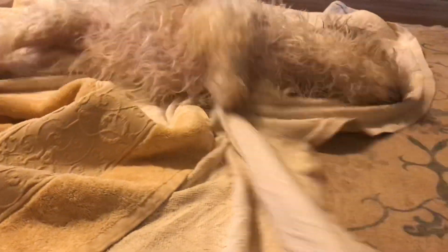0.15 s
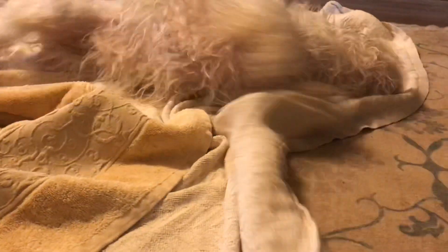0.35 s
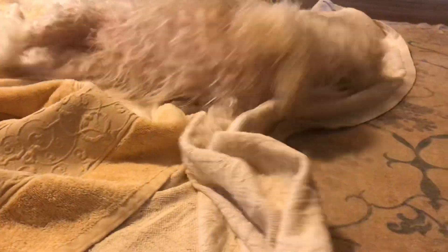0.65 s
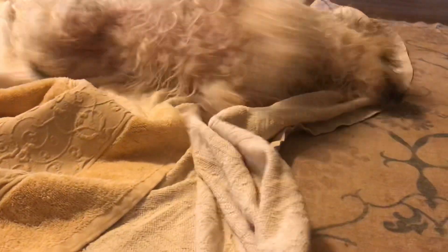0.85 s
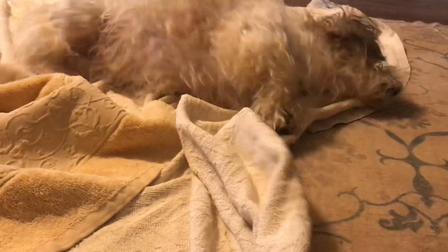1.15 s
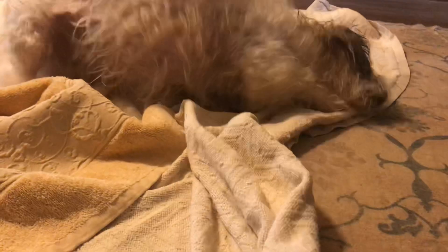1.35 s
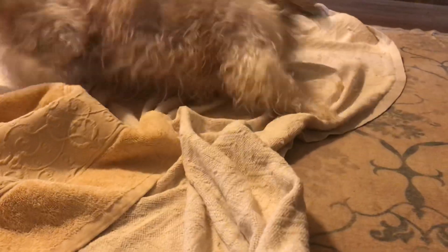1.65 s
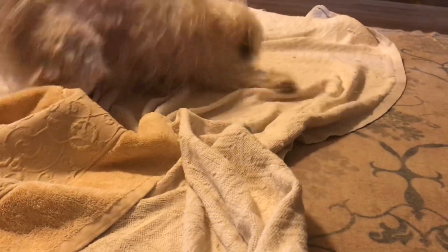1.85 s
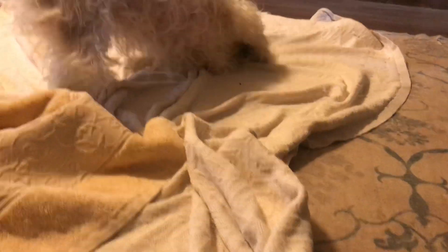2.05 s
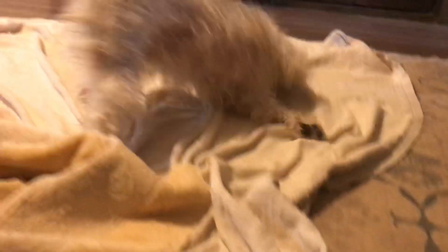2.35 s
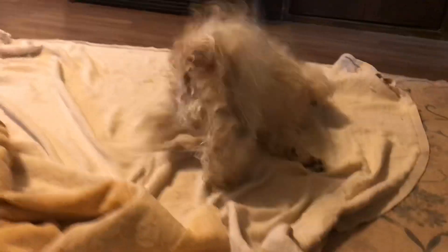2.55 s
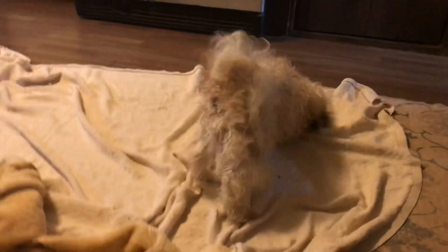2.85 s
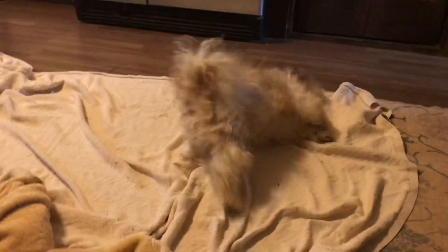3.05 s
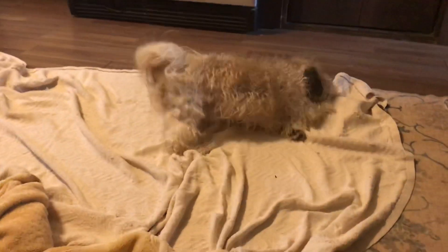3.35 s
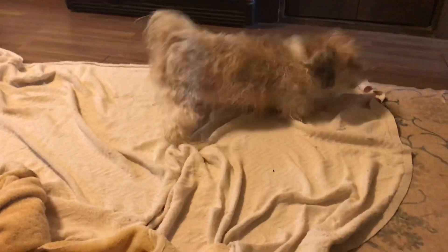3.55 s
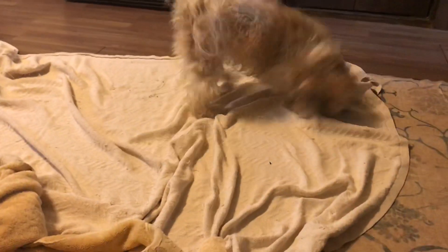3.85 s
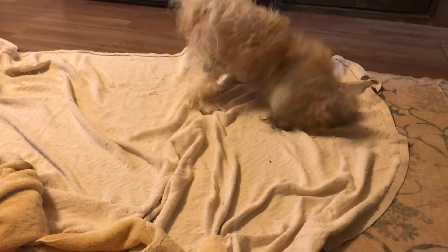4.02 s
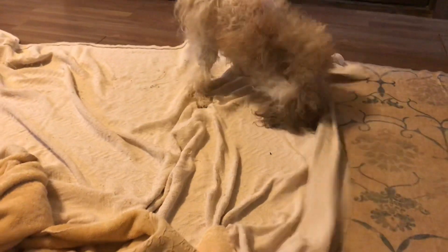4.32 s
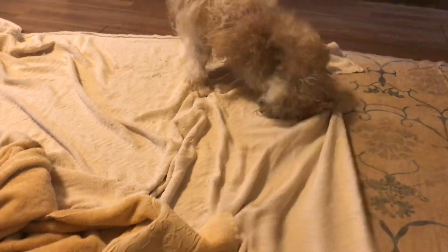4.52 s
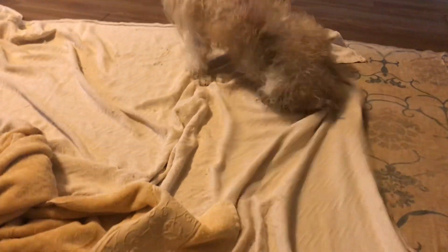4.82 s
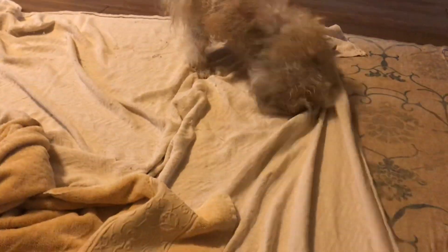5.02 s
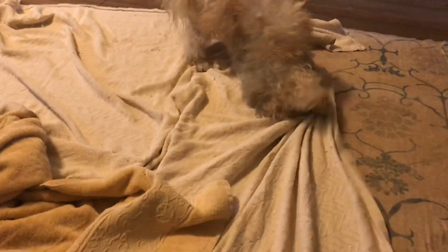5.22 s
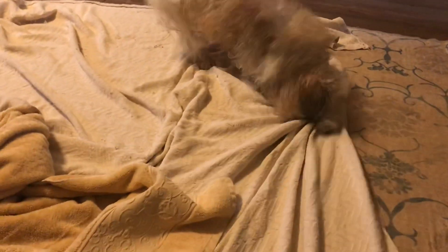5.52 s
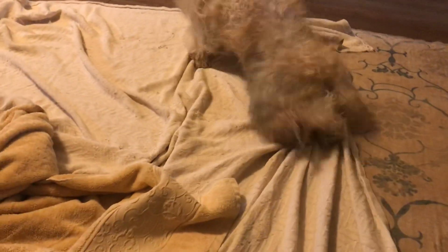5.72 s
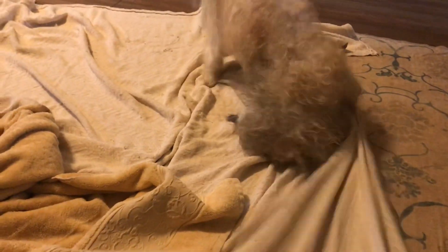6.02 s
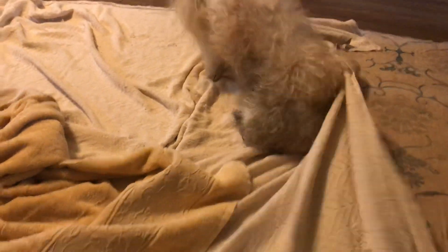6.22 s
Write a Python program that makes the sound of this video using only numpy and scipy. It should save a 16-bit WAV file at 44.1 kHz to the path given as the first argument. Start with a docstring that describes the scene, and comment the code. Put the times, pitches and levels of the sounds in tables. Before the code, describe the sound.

Close up indoors, a little dog blasts air through its wet nose in rapid rattling bursts, then calms into uneven snuffling. Cloth strokes and light fur swishes accompany its wriggling, with soft knocks of paws and body on a padded floor. Later come quick nasal in-breaths, dull drags on the towel, dry fabric ticks and a last rustle. A low steady mains hum and still air lie beneath.

```python
"""Dog snorting on towels

A small dog rolls and roots on towels on a living-room floor, with four snorts: noise jets through
nasal resonances, chopped by the palate, over a throat rush. Snuffles, two dull drags or presses,
gasps and faint whistles are shaped noise; fur and cloth rub as crackling noise; bumps and fold
snaps are damped pulses with noise. A mains hum and still air lie under it all; a small room answers."""
import sys
import numpy as np
from scipy import signal
from scipy.fft import rfft, irfft, next_fast_len
from scipy.io import wavfile
from scipy.ndimage import uniform_filter1d, map_coordinates

SR = 44100
rng = np.random.default_rng(int(sys.argv[2]) if len(sys.argv) > 2 else 0)


def file_out(sig):
    """Save sig as 16-bit WAV at sys.argv[1]."""
    # one column per channel
    cols = np.atleast_2d(sig).T
    # limit, then scale
    lim = np.clip(cols, -1, 1)
    pcm = np.round(lim * 32767).astype(np.int16)
    wavfile.write(sys.argv[1], SR, pcm)


N = 281358
TIME = np.arange(N) / SR


def amp(db):
    """Decibels to gain."""
    return 10 ** (np.asarray(db) / 20)


def unit(x):
    """Scale to rms 1."""
    return x / np.sqrt(np.mean(x ** 2) + 1e-20)


def fade(t, t60):
    """Exponential decay from t = 0, 60 dB down after t60 seconds."""
    return amp(-60 * np.maximum(t, 0) / t60)


def along(points, hz):
    """Read (frequency [Hz], value) points on a log frequency axis."""
    f, v = np.transpose(points)
    return np.interp(np.log(hz + 1), np.log(f + 1), v)


def filtered(x, response):
    """Multiply the spectrum of x by a function of frequency."""
    m = next_fast_len(len(x) + SR // 8)
    spectrum = rfft(x, m) * response(np.fft.rfftfreq(m, 1 / SR))
    return irfft(spectrum, m)[:len(x)]


def coloured(x, spectrum):
    """x shaped by (frequency [Hz], level [dB]) points, rms 1."""
    return unit(filtered(x, lambda f: amp(along(spectrum, f))))


def resonated(x, modes):
    """x through parallel (frequency [Hz], width [Hz], level [dB]) resonances of alternating sign, rms 1."""
    def response(f):
        total = 0
        for k, (centre, width, db) in enumerate(modes):
            band = 1j * f * width / (centre * centre - f * f + 1j * f * width)
            total = total + (-1) ** k * amp(db) * band
        return total
    return unit(filtered(x, response))


def wobble(rate, size=N):
    """Smooth random curve, rate knots a second."""
    knots = rng.standard_normal(int(size * rate / SR) + 4)
    return map_coordinates(knots, [np.arange(size) * rate / SR])


def turbulence(rate, depth_db, size=N):
    """Noise in small spurts, its colour shifting from moment to moment."""
    z = signal.stft(rng.standard_normal(size), nperseg=256)[2]
    patches = uniform_filter1d(rng.standard_normal(z.shape), size=4, axis=0)  # across frequency
    patches = uniform_filter1d(patches, size=6, axis=1)  # across time
    noise = signal.istft(z * amp(3.24 * unit(patches)))[1][:size]
    return noise * amp(depth_db * wobble(rate, size))


def crackle(rate):
    """Sparse clicks of uneven size, on average rate a second, rms 1."""
    return unit(rng.standard_normal(N) * (rng.random(N) < rate / SR))


def puff(t, rise, hold, t60):
    """A flow that swells from a soft start, holds and dies away."""
    swell = np.sin(np.pi / 2 * np.clip(t / rise, 0, 1)) ** 1.02
    return swell * fade(t - rise - hold, t60)


def thud(t, hz, cycles):
    """Damped sine under an envelope that crests at 1 after some cycles."""
    u = t * hz / cycles
    return u ** 2 * np.exp(2 * (1 - u)) * np.sin(2 * np.pi * hz * t)


def add(track, s, sound):
    """Mix a sound into the track at time s."""
    part = track[max(round(s * SR), 0):][:len(sound)]
    part += sound[:len(part)]


def gush(t):
    """Pressure builds for a few milliseconds behind the palate and drops as it slaps shut."""
    return np.exp(-((t + .0035) / .004) ** 2) - np.exp(-((t - .0035) / .0035) ** 2)


def wandering(x, depth, rate):
    """The resonances in x drift up and down together, as soft walls move."""
    return map_coordinates(x, [np.cumsum(1 + depth * wobble(rate))], mode="mirror")


# snorts: (time [s], rise [s], hold [s], fade t60 [s], nose [dB], throat [dB], nostril flare [0-1],
#          palate flutter [Hz])
SNORTS = [(0.0782, 0.048, 0.035, 0.086, -29.5, -35, 0.22, 55.95),
          (0.828, 0.052, 0.037, 0.15, -30, -34.5, 0.8, 73.7),
          (1.49, 0.045, 0.033, 0.095, -32, -37, 0.08, 77.54),
          (3.006, 0.00078, 0.0055, 0.2, -41, -37, 0, 77.9)]
# narrow nasal passages: (frequency [Hz], width [Hz], level [dB])
NARROW_NOSE = [(1430, 200, -3.5), (2485, 520, 0.5), (2980, 600, 0.5), (4590, 270, -3.5), (5260, 520, -6),
               (7130, 220, -2), (8140, 370, -7.5), (9560, 510, -8), (11300, 820, -13), (14900, 4400, -18.5)]
# wide nostrils: (frequency [Hz], level [dB])
FLARED_NOSE = [(300, -58), (1300, -2), (1900, -5.5), (3600, 4), (5300, -5.5), (6700, -0.5), (9200, -2.5),
               (10500, -6.5), (15500, -11)]
# throat resonances: (frequency [Hz], width [Hz], level [dB])
THROAT = [(146, 72, -5), (692, 104, -7.5), (1010, 115, -4.5)]
NASAL_DRIFT, DRIFTS_PER_S = 0.022, 60  # scale of the wander as a share of pitch
# above SNORT_TOP_HZ the jet lags its body and grows faster than the flow
SNORT_TOP_HZ, SNORT_TOP_POWER, TOP_LAG_S = 5000, 1.4, 0.0018


def snorts(beats):
    """Air blasts through the wet nose, chopped by palate flaps, and the throat; stronger flow is brighter."""
    gush_db = sum(db * gush(TIME - s) for s, _, _, db in beats)
    jet = unit(turbulence(rate=420, depth_db=0.4)) + 0.37 * crackle(rate=1100)
    narrow = wandering(resonated(jet, NARROW_NOSE), NASAL_DRIFT, DRIFTS_PER_S)
    wide = wandering(coloured(jet, FLARED_NOSE), NASAL_DRIFT, DRIFTS_PER_S)
    rush = resonated(turbulence(rate=310, depth_db=1.5), THROAT)
    rush = unit(filtered(rush, lambda f: 1 / (1 + (f / 1500) ** 4)))
    nose, throat = np.zeros(N), np.zeros(N)
    for s, rise, hold, t60, nose_db, throat_db, flare, _ in SNORTS:
        flare = np.clip(flare, 0, 1)
        air = unit((1 - flare) * narrow + flare * wide)
        body = filtered(air, lambda f: 1 / (1 + (f / SNORT_TOP_HZ) ** 4))
        flow = puff(TIME - s, rise, hold, t60)
        top_flow = puff(TIME - s - TOP_LAG_S, rise, hold, t60) ** SNORT_TOP_POWER
        nose += amp(nose_db + gush_db) * (flow * body + top_flow * (air - body))
        throat += amp(throat_db) * flow * rush
    return nose, throat


FLAP_DB, FLAP_HZ, FLAP_JITTER_S = 10, 673, 0.00088  # level over throat rush, typical ring, timing scatter
FLARE_POP_DB, FLARE_RELIEF = 7.5, 0.7  # at full flare: louder pops, share of chopping lost
CHOP_DB = 6.5  # gush over the steady jet, choked after it, at full flow without flare


def flutter():
    """The palate flaps near-steadily, as hard as the air flows: rows (s, level dB, ring Hz, gush dB)."""
    rows = []
    for s, rise, hold, t60, _, throat_db, flare, hz in SNORTS:
        chance = rng.standard_normal((12, 4))  # 12 flaps a snort
        for k, (late, size, pitch, spurt) in enumerate(chance, 1):
            flow = puff(k / hz, rise, hold, t60)
            db = throat_db + FLAP_DB + FLARE_POP_DB * flare + 20 * np.log10(flow ** 2 + 1e-6)
            gush_db = CHOP_DB * (1 - FLARE_RELIEF * flare) * flow * (1 + 0.041 * spurt)
            ring_hz = FLAP_HZ * np.exp(.18 * pitch)
            rows.append((s + k / hz + FLAP_JITTER_S * late, db + 2.0 * size, ring_hz, gush_db))
    return rows


# palate slamming shut: (time [s], level [dB], ring [Hz])
SLAMS = [(.078, -21.5, 990), (.1155, -21, 586), (.869, -18, 760), (.880, -13.5, 1060), (0.9089, -8.5, 800),
         (3.0072, -21.5, 794), (3.019, -27, 850)]
PUSH_DB, SLAM_PUSH_DB, WET_CLICK_DB = -26, -12.5, -25.5  # relative to the pop


def flaps(beats):
    """Each palate slap pops in the throat with a wet-tissue click and pushes out a slug of air."""
    out, t = np.zeros(N), TIME[:SR // 16]
    push = thud(t, hz=163, cycles=0.27)
    for slaps, push_db in [(beats, PUSH_DB), (SLAMS, SLAM_PUSH_DB)]:
        for s, db, hz, *_ in slaps:
            click = amp(WET_CLICK_DB) * rng.standard_normal(len(t)) * fade(t, t60=0.025)
            pop = thud(t, hz, cycles=0.82)
            add(out, s, amp(db) * (pop + amp(push_db) * push + click))
    return out


# lowest room modes: (frequency [Hz], width [Hz], level [dB])
BOOM_MODES = [(78, 7, 3.5), (172, 14, -5)]


def boom():
    """Each snort's blast stirs the lowest room modes 25 ms late: narrow noise bands follow its flow."""
    drive = 0
    for s, rise, hold, t60, _, throat_db, *_ in SNORTS:
        drive = drive + amp(throat_db) * puff(TIME - s - .025, rise, hold / 2, t60)
    return drive * resonated(rng.standard_normal(N), BOOM_MODES)


# sniffs, and two dull muffled drags or presses on the towel at 4.19 and 4.77:
# (time [s], rise [s], fade t60 [s], level [dB], brightness [dB], nasal band [dB])
SNUFFLES = [(0.762, 0.022, 0.54, -56.5, -4, 5.5), (1.651, 0.013, 0.62, -52.5, -4.5, 1.5),
            (1.753, 0.0068, 0.76, -51.5, 10.5, 5), (2.468, 0.016, 0.35, -54, -6, 1),
            (2.556, 0.0095, 0.3, -49.5, -5, -3), (2.631, 0.0044, 0.37, -43, -4, -4),
            (2.724, 0.009, 0.7, -50, 6.5, -2), (2.779, 0.0045, 0.4, -43.5, -3.5, 3.5),
            (3.688, 0.019, 0.46, -39.5, 3.5, 0), (4.189, 0.019, 0.23, -46.5, -24.5, -26),
            (4.462, 0.024, 0.31, -41, -7, 1), (4.54, 0.0093, 0.32, -45.5, 0.5, -1),
            (4.65, 0.0037, 0.32, -55, 8, 9), (4.679, 0.0093, 0.28, -53, 0.5, 11.5),
            (4.772, 0.034, 0.19, -39.5, -17, -14), (5.447, 0.038, 0.55, -56.5, -1.5, 8.5),
            (5.647, 0.0034, 0.37, -49.5, 1, 6)]
# nasal band: (frequency [Hz], level [dB])
SNIFF = [(480, -5.5), (1080, 1), (1900, 0.5), (2330, 3.5), (3000, -2), (4200, -9), (12000, -91)]
# nostril hiss, also the colour of snap ticks: (frequency [Hz], level [dB])
HISS = [(1500, -19), (3400, 3), (6000, -1), (9600, -9.5), (10500, -14.5), (15500, -13)]
# lingering narrow band: (frequency [Hz], level [dB])
NASAL_RING = [(1800, -40), (2300, -1), (2620, -2.5), (2950, -42)]
MUZZLE_HZ, MUZZLE_OCTAVE_DB = 1600, 19.5  # resonance sinks an octave per this much negative brightness
RING_DB, RING_LINGER = -4, 1.05  # lingering band over nasal band: level, fade-time ratio
FOLLOW_LAG = 0.36  # nasal band delay, share of the rise
HISS_POWER = 1.51  # hiss grows faster than flow


def snuffles():
    """Sniffs and two dull drags or presses: a low resonance leads, nasal band, hiss and a narrow band follow."""
    out, t = np.zeros(N), TIME[:SR // 2]

    def air(shape):
        return coloured(turbulence(rate=380, depth_db=1.5, size=len(t)), shape)

    for s, rise, t60, db, bright_db, nose_db in SNUFFLES:
        hz = MUZZLE_HZ * 2 ** (min(bright_db, 0) / MUZZLE_OCTAVE_DB)
        hollow = [(hz / 6, -14), (hz / 2, -14), (hz * 0.95, 1), (hz * 1.78, -5), (hz * 3, -25), (hz * 10, -48)]
        muzzle = air(hollow) * puff(t, rise / 2, rise / 2, t60)
        nose = amp(nose_db) * air(SNIFF) * puff(t - FOLLOW_LAG * rise, rise, 0, t60)
        hiss = amp(bright_db) * air(HISS) * puff(t, rise, rise, t60) ** HISS_POWER
        ring = amp(nose_db + RING_DB) * air(NASAL_RING) * puff(t, rise + 0.014, 0, t60 * RING_LINGER)
        add(out, s, amp(db) * (muzzle + nose + hiss + ring))
    return out


# in-draughts through pinched nostrils: (time [s], rise [s], level [dB], resonance [Hz],
#                                        upper resonances [dB])
GASPS = [(3.600, 0.0026, -53.5, 1580, -1), (3.644, 0.0091, -38, 1630, -8.5),
         (4.437, 0.029, -36.5, 1154, -17)]
GASP_T60_S = 0.15


def gasps():
    """Air drawn in sharply rings one muzzle resonance, lower and duller when pressed into the towel."""
    out, t = np.zeros(N), TIME[:SR // 4]
    for s, rise, db, hz, upper_db in GASPS:
        shape = [(hz / 2, -35), (hz * 0.76, -9), (hz, 0), (hz * 1.12, -8),
                 (hz * 2.78, upper_db), (hz * 3, upper_db - 23.5)]
        air = coloured(rng.standard_normal(len(t)), shape)
        add(out, s, amp(db) * air * puff(t, rise, rise / 2, GASP_T60_S))
    return out


# thin nostril whistles: (time [s], length [s], level [dB])
WHISTLES = [(0.295, 0.056, -54), (5.266, 0.069, -58.5)]


def whistles():
    """Air squeezes through a nearly closed nostril: noise in two high resonances."""
    flow = 0
    for s, length, db in WHISTLES:
        flow = flow + amp(db) * puff(TIME - s, length / 2, length / 4, t60=0.08)
    return flow * resonated(rng.standard_normal(N), [(6440, 590, -1.5), (9500, 730, -1)])


# strokes on the towel; the row at 0.174 is the bright hissing end of the first snort:
# (time [s], length [s], cloth [dB], fur over cloth [dB])
RUBS = [(0.174, 0.083, -67, 16), (0.406, 0.082, -57.5, -12), (0.492, 0.11, -50, -25),
        (1.675, 0.095, -50, -7.5), (1.762, 0.21, -63, -4), (2.069, 0.039, -52.5, -40),
        (2.311, 0.14, -60, 3.5), (2.907, 0.21, -48.5, -0.5), (3.265, 0.051, -63, -38), (3.3, 0.08, -72, 0),
        (3.66, 0.17, -51, 9.5), (4.185, 0.086, -52, -12), (4.788, 0.094, -47, -39),
        (4.967, 0.076, -61, -10), (5.129, 0.14, -58.5, -2), (5.294, 0.041, -67, 10),
        (5.848, 0.37, -58.5, -4), (6.225, 0.14, -46.5, -5.5), (6.348, 0.04, -52, 4.5)]
# light rustle as the dog wriggles: (time [s], level [dB])
WRIGGLE = [(0, -58.5), (.7, -55.5), (1.15, -63), (2.1, -59.5), (3.4, -63), (4.1, -65.5), (5, -63.5),
           (6.3, -66.5)]
# cloth colour: (frequency [Hz], level [dB])
CLOTH = [(60, 13), (380, 6.5), (1100, 6.5), (2400, 2.5), (4200, -3.5), (8000, -41)]
# fur colour: (frequency [Hz], level [dB])
FUR = [(1500, -16), (3800, -0.5), (6500, -1.5), (9600, -4), (10500, -8.5), (15500, -9.5)]
WRIGGLE_FUR_DB = -4  # fur over cloth in the rustle


def rubbing():
    """Terry loops catch and let go, some with a small tick, and fur hisses finer; one row ends a snort."""
    cloth = amp(np.interp(TIME, *np.transpose(WRIGGLE)))
    fur = amp(WRIGGLE_FUR_DB) * cloth
    for s, length, db, fur_db in RUBS:
        stroke = amp(db) * puff(TIME - s, 0.33 * length, 0.39 * length, 0.84 * length)
        cloth = cloth + stroke
        fur = fur + amp(fur_db) * stroke
    loops = coloured(unit(turbulence(rate=500, depth_db=0.0)) + 0.5 * crackle(rate=350), CLOTH)
    hairs = coloured(unit(turbulence(rate=1600, depth_db=-1.5)) + 0.09 * crackle(rate=300), FUR)
    return (cloth * loops + fur * hairs) * amp(1.5 * wobble(rate=25))


# paws, muzzle and body on the padded floor: (time [s], level [dB], ring [Hz])
BUMPS = [(0.395, -36.5, 334), (0.474, -36, 393), (0.493, -37, 470), (1.791, -33, 354), (2.351, -37.5, 407),
         (2.512, -39, 246), (3.253, -40, 604), (3.668, -37.5, 212), (4.809, -36, 474), (5.118, -44, 610)]


def bumps():
    """Padded contacts: a dead knock and a dull scuff as the towel gives."""
    out, t = np.zeros(N), TIME[:SR // 10]
    for s, db, hz in BUMPS:
        dull = [(hz / 3, -8), (hz, 0), (hz * 4, -22)]
        scuff = coloured(rng.standard_normal(len(t)), dull) * fade(t, t60=0.19)
        add(out, s, amp(db) * (thud(t, hz, cycles=0.83) + amp(-16.0) * scuff))
    return out


# fold snaps and, at 4.803, the knock of a soft thump: (time [s], tick [dB], flap over tick [dB])
SNAPS = [(0.344, -52.5, 18.5), (0.491, -48, 25), (0.529, -50.5, 18), (4.803, -50, 25.5), (4.985, -35, 4.5),
         (5.267, -53, 14.5), (5.336, -43, 3.5)]


def snaps():
    """A fold pulling taut, or once a soft thump's knock: a dry tick and a short pulse that shivers out."""
    out, t = np.zeros(N), TIME[:SR // 10]
    for s, db, flap_db in SNAPS:
        tick = coloured(rng.standard_normal(len(t)), HISS) * fade(t, t60=0.0046)
        shiver = resonated(rng.standard_normal(len(t)), [(1090, 300, 0)]) * fade(t, t60=0.044)
        flap = thud(t, hz=1230, cycles=0.12) + amp(-16.5) * shiver
        add(out, s, amp(db) * (tick + amp(flap_db) * flap))
    return out


# room decay: (frequency [Hz], t60 [s])
ROOM_DECAY = [(700, 0.37), (2450, 0.29), (3500, 0.18), (9000, 0.21)]


def room(x):
    """The walls answer; each frequency of the noise tail dies at its own speed."""
    hz, t, z = signal.stft(rng.standard_normal(SR * 2 // 3), SR, nperseg=256)
    decay = fade(t, along(ROOM_DECAY, hz)[:, None])
    tail = signal.istft(z * decay, SR, nperseg=256)[1]
    tail *= np.clip(TIME[:len(tail)] / 0.011, 0, 1)  # 11 ms build-up
    return signal.fftconvolve(x, tail / np.linalg.norm(tail))[:N]


# hum harmonics 1-3: (level [dB])
HUM_DB = [-49.5, -70, -71.5]
# still room air: (frequency [Hz], relative density [dB])
AIR = [(22, -16), (41, 21), (55, 4), (76, 10), (210, 3.5), (340, -2.5), (700, -9), (2500, -26), (9000, -35),
       (15500, -34)]
HUM_HZ = 120  # fundamental


def background():
    """Mains hum of an appliance, three harmonics of slightly unsteady level, over still-air noise."""
    hum = 0
    for k, db in enumerate(HUM_DB, 1):
        cycles = k * HUM_HZ * TIME + rng.random()
        hum = hum + amp(db) * np.sqrt(2) * np.sin(2 * np.pi * cycles)
    air = amp(-54.5) * coloured(rng.standard_normal(N), AIR)
    return hum * amp(0.26 * wobble(rate=2.42)) + air


def scene():
    """The dog and its towels in the room."""
    beats = flutter()
    nose, throat = snorts(beats)
    pops = flaps(beats)
    cloth = rubbing() + bumps() + snaps()
    sniffs = snuffles() + gasps() + whistles()
    snort_send = amp(-8.5) * nose + amp(-10.0) * throat + amp(-19) * pops
    echo = room(snort_send + amp(-10.0) * sniffs + amp(-11) * cloth)
    return (nose + throat + pops + boom() + sniffs + cloth + echo + background())[None]


TOP_HZ = 15700  # no sound from here up


def record(dry):
    """The sound loses the deepest bass, softens at the top and stops at 15.7 kHz."""
    def response(f):
        bass = f ** 4 / (f ** 4 + 33 ** 4)
        treble = 1 / np.sqrt(1 + (f / TOP_HZ) ** 12)
        return (f < TOP_HZ) * bass * treble
    return filtered(dry[0], response)[None]


dry = scene()
out = record(dry)
file_out(out)
```